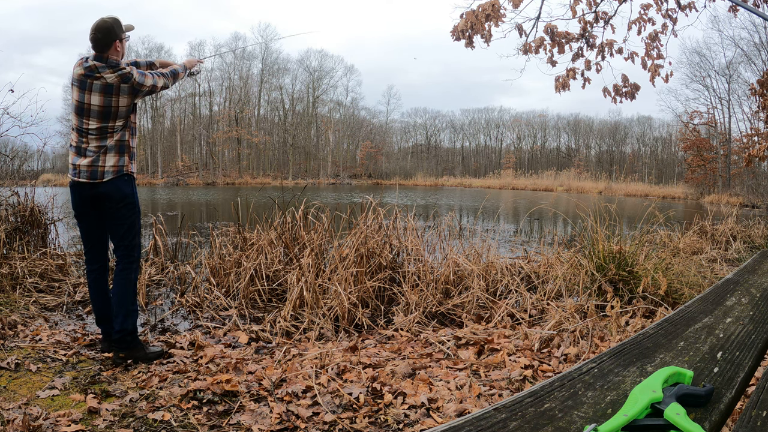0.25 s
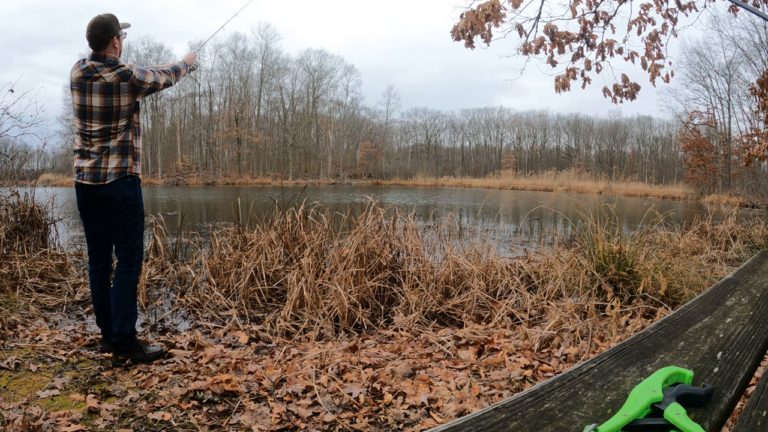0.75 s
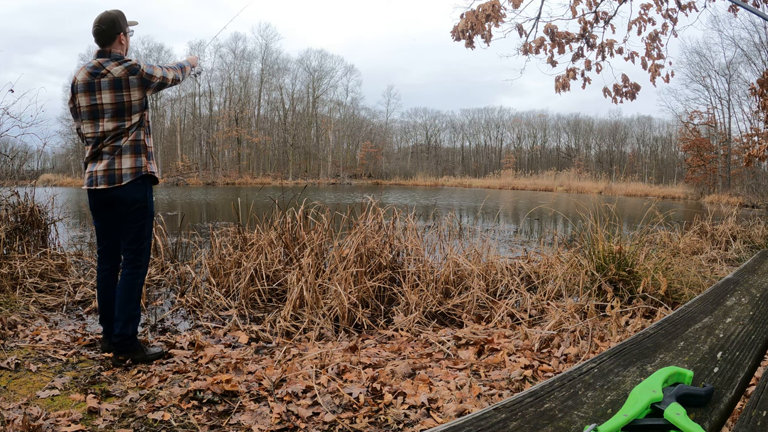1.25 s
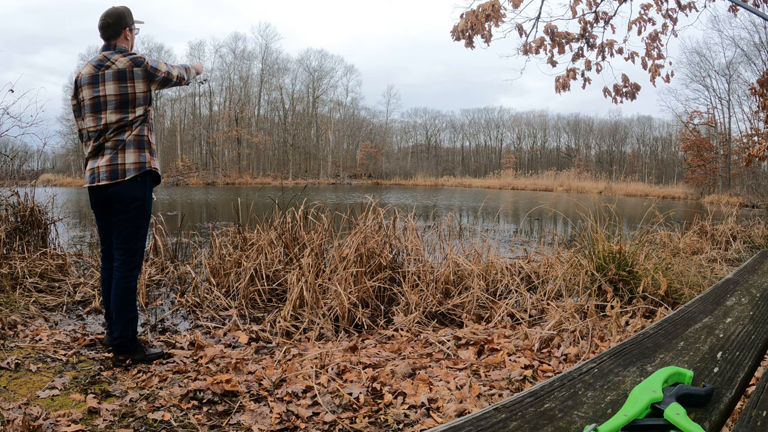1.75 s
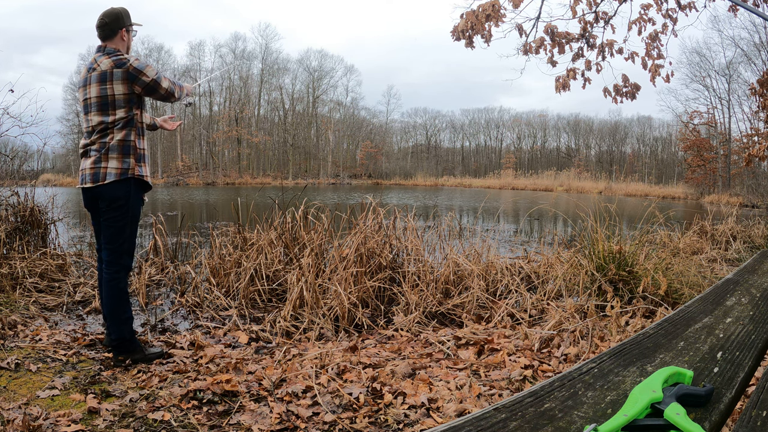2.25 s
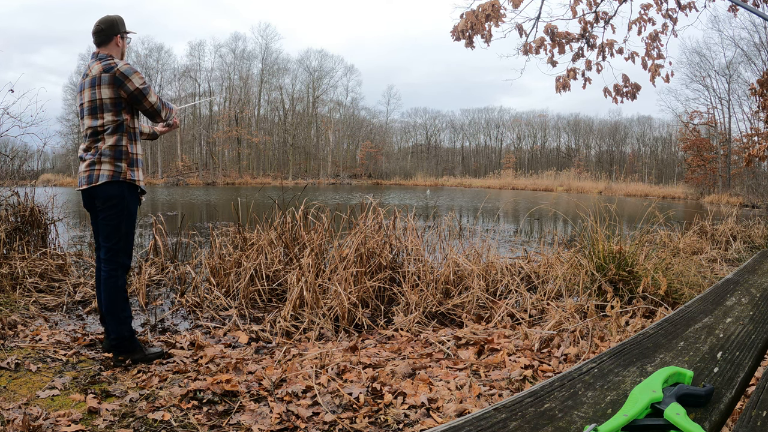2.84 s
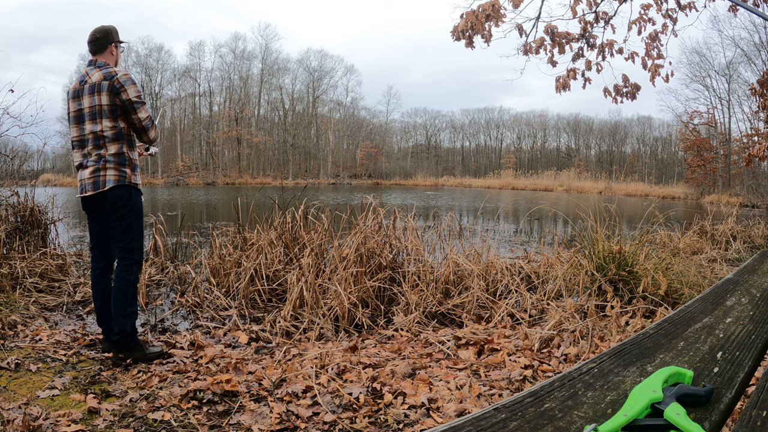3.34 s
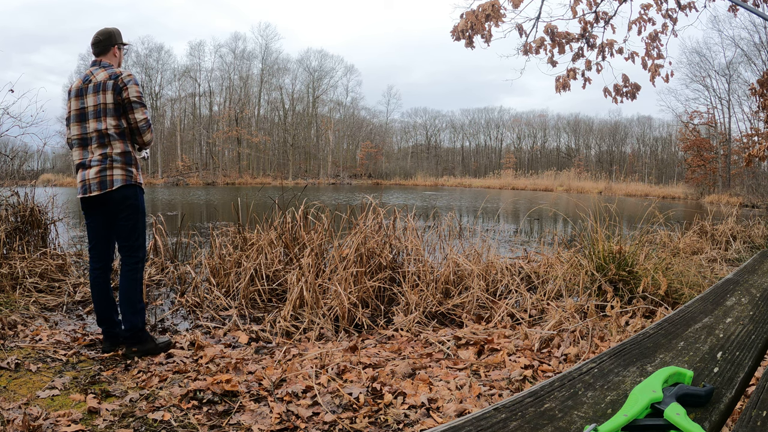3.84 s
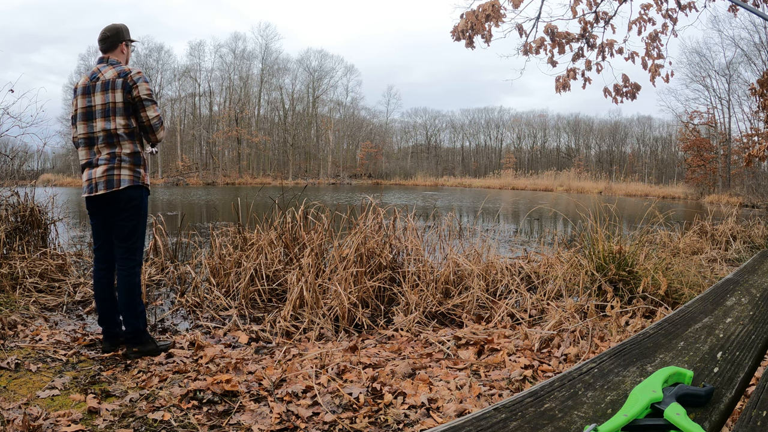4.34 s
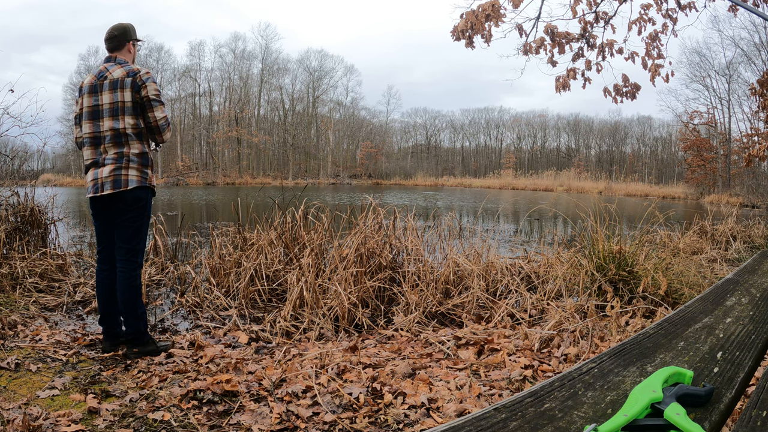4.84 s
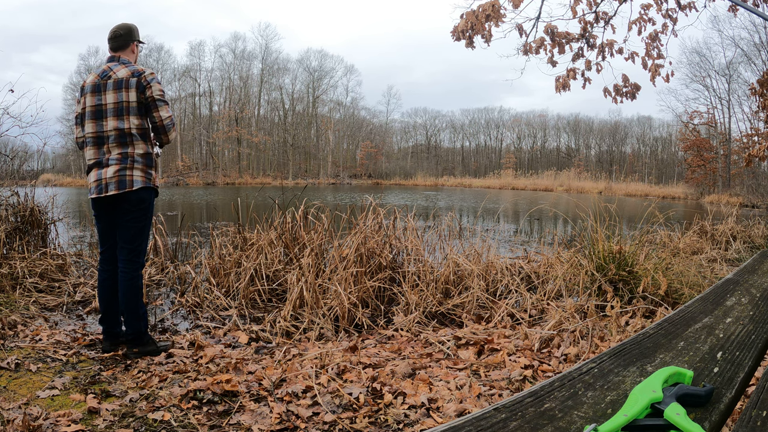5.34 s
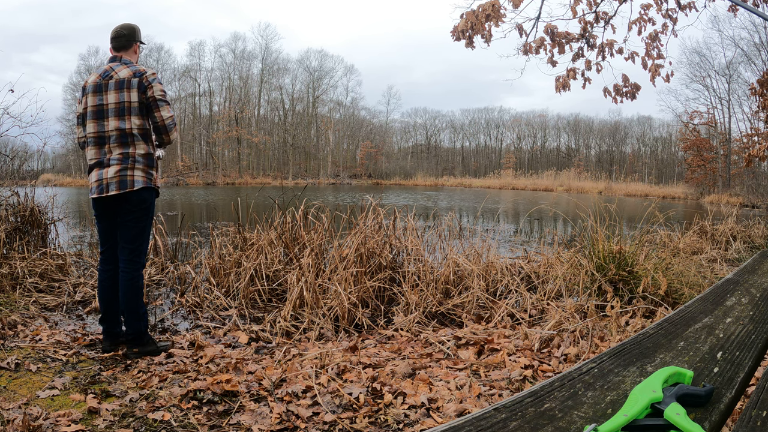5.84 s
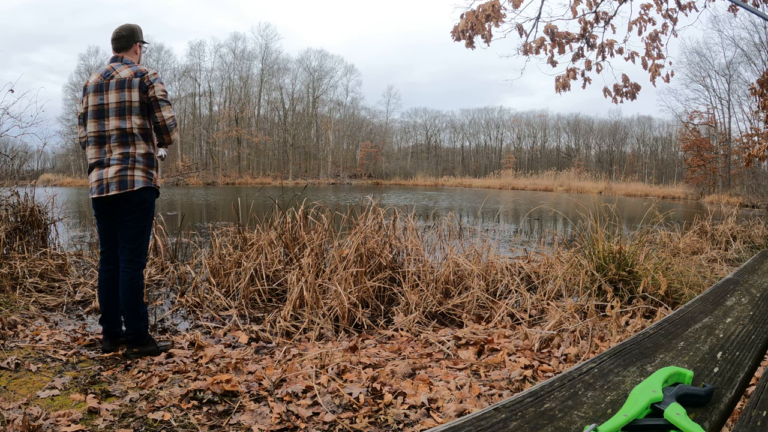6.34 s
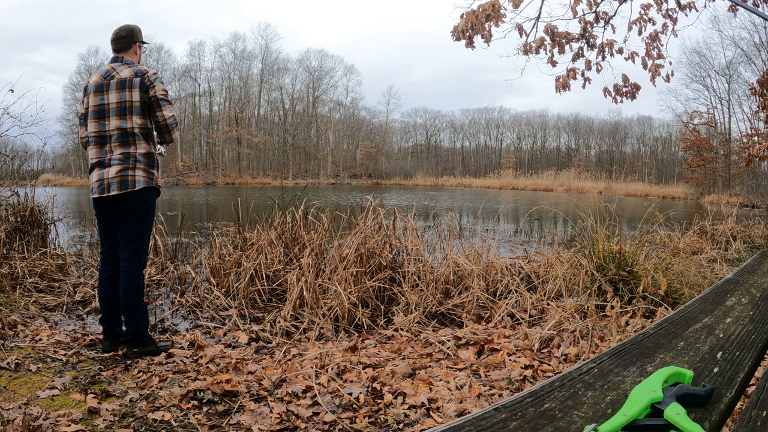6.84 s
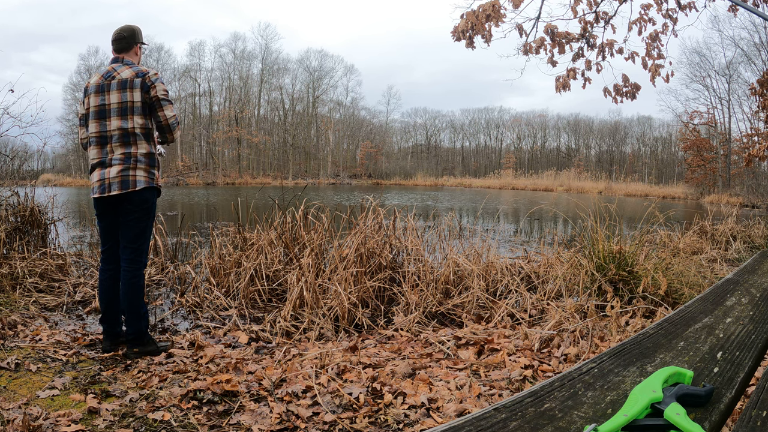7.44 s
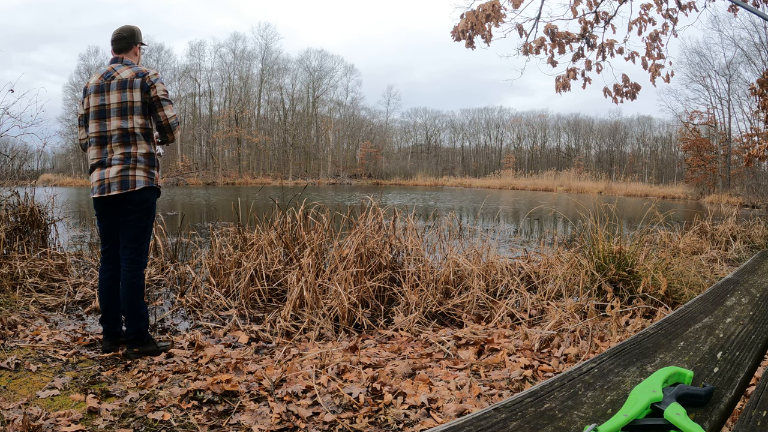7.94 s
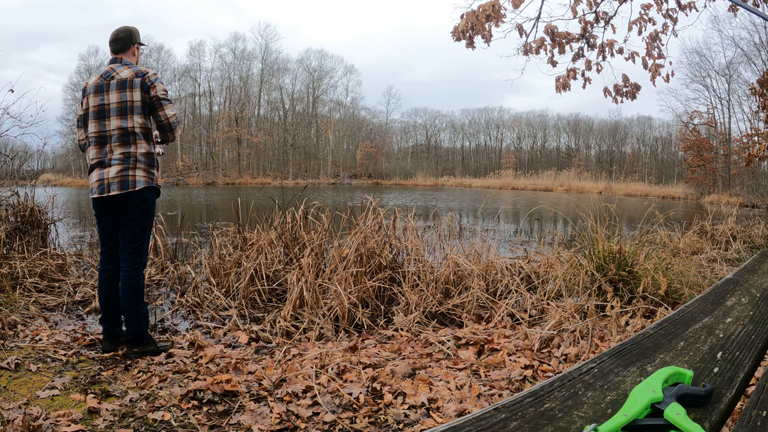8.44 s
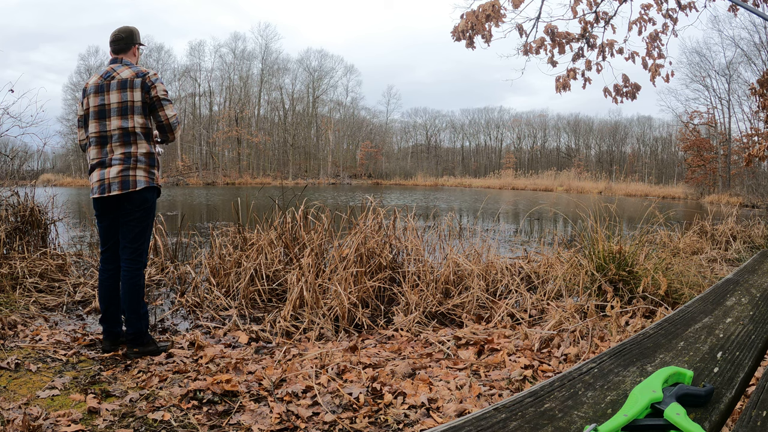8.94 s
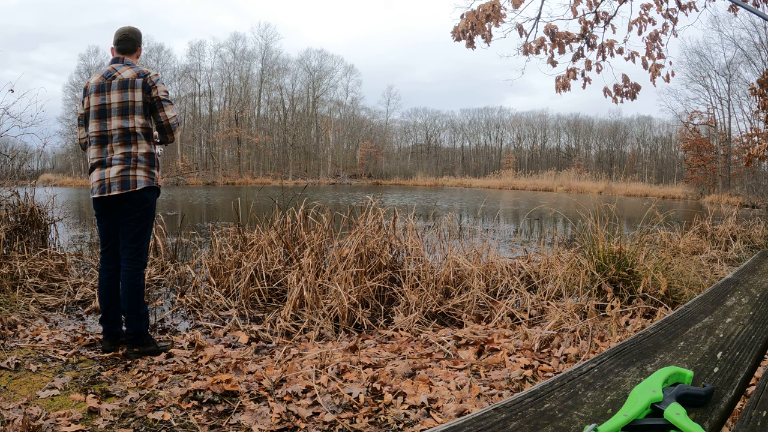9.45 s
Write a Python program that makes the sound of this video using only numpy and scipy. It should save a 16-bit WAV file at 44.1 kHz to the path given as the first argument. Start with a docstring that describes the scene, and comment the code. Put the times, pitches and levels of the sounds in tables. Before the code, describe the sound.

A fishing rod swishes into a sharp snapping crack, echoing through bare woods, then line hisses off the reel over a low distant road rumble.

```python
"""A fishing cast beside a pond

A rod is cast in bare woods: a short swell of noise leads into a snap (pressure pulses, a short modal ring);
evenly spaced planks return it as a sinking, noisy chirp, reeds and trees as lumpy, decaying noise.
Line hisses off the spool, its spectral peak sinking as the lure slows; later the reel ticks (resonant
clicks) and slack line rubs and squeaks. A distant road lies under it all: low rumble, passing heavy
vehicles, tyre roar and narrow-band tyre tones."""
import sys
import numpy as np
from scipy import signal
from scipy.fft import rfft, irfft, next_fast_len
from scipy.io import wavfile
from scipy.ndimage import uniform_filter1d, map_coordinates

SR = 44100
rng = np.random.default_rng(int(sys.argv[2]) if len(sys.argv) > 2 else 0)


def wrap_up_sound(samples):
    """Save the sound to the file named by the first command line argument, as 16-bit audio."""
    columns = np.atleast_2d(samples).T
    # keep every value between -1 and 1, then stretch to whole-number steps
    tamed = np.clip(columns, -1, 1)
    steps = np.round(tamed * 32767).astype(np.int16)
    wavfile.write(sys.argv[1], SR, steps)


N = 427329

# left-right correlation of the near sounds: [f/Hz, correlation]
NEAR_LIKENESS = [(600, .8), (3000, 0.9), (7000, .87), (12000, 0.6)]
# relative spectrum of line rubbing on a solid: [f/Hz, level/dB]
RUB_SPECTRUM = [(1500, -28.5), (3000, -4.5), (4200, 2), (6300, 1), (7700, 4), (9000, -8.5), (10700, -14.5),
                (12200, -7.5), (13500, -20.5), (15500, -34)]
SNAP_S = .2011  # moment of the snap, s


def amp(db):
    """Level definition: decibels to amplitude gain."""
    return 10 ** (np.asarray(db) / 20)


def unit(x):
    """Power normalisation: scale to rms 1."""
    return x / np.sqrt(np.mean(x ** 2) + 1e-20)


def along(points, hz):
    """Log-frequency interpolation of (f/Hz, value) points."""
    f, v = np.transpose(points)
    return np.interp(np.log(hz + 1), np.log(f + 1), v)


def curves(rows):
    """Linear interpolation in time: one value per sample for each column after t/s."""
    s, *cols = np.transpose(rows)
    return [np.interp(np.arange(N) / SR, s, c) for c in cols]


def wobble(rate):
    """Low-frequency random modulation: a smooth curve through `rate` random knots a second."""
    knots = rng.standard_normal(int(N * rate / SR) + 4)
    return map_coordinates(knots, [np.arange(N) * rate / SR])


def filtered(x, response):
    """Linear filtering: the spectrum of x times a response of frequency."""
    n = x.shape[-1]
    m = next_fast_len(n + 8192)  # padded against wrap-around
    return irfft(rfft(x, m) * response(np.fft.rfftfreq(m, 1 / SR)), m)[..., :n]


def bump(hz, centre, width):
    """Resonance curve: gain 1 at the centre, half power at the edges of the width."""
    return 1 / np.sqrt(1 + (2 * (hz - centre) / width) ** 2)


def colour(points):
    """Spectral shaping: gain as a function of frequency, from (f/Hz, level/dB) points."""
    return lambda hz: amp(along(points, hz))


def noise(gain, alike, size=N):
    """Partly coherent stereo noise of rms 1: mid and side powers set the left-right correlation."""
    def mid_side(hz):
        turn = np.arccos(np.clip(along(alike, hz), -1, 1)) / 2
        return gain(hz) * np.array([np.cos(turn), np.sin(turn)])

    mid, side = filtered(rng.standard_normal((2, size)), mid_side)
    return unit(np.array([mid + side, mid - side]))


def patches(shape, depth_db, size):
    """Random spectral fluctuation: a gain field over frequency and time, smoothed over size cells."""
    field = uniform_filter1d(rng.standard_normal(shape), size[0], 0)
    field = uniform_filter1d(field, size[1], 1)
    return unit(amp(depth_db * unit(field)))


def placed(x, s):
    """Time shift: a short stereo sound set into the scene at time s."""
    return np.pad(x, ((0, 0), (round(s * SR), N)))[:, :N]


def leftward(x, lean_db):
    """Level difference between the ears: the left is louder than the right by lean_db."""
    return x * amp(np.array([[lean_db], [-lean_db]]) / 2)


def snap(push_db, push_hz, push_s, thump_db, thump_hz, thump_lag, thump_s, crack_db, crack_lag,
         lead_in_db, lead_in_t60, scatter_db, scatter_t60, ring_attack):
    """Impulsive radiation: noise swells into a push of air with a steep crack, a thump, ring and scatter."""
    # relative spectrum of the crack and the noise around it: [f/Hz, level/dB]
    crack_spectrum = [(500, -8.5), (1200, -3), (2000, -1.5), (3100, 3), (4200, -1), (5200, 0.5),
                      (6200, -2.5), (7200, -5.5), (8300, -1), (9700, -12), (10700, -6.5), (12000, -20),
                      (15500, -28)]
    # modes of the rod: [f/Hz, level/dB, t60/s]
    rod_modes = [(660, -25, .016), (2980, -41, .025), (3245, -35, .025), (4812, -40, .03)]
    # reflections off the ground and the bench: [delay/s, level/dB]
    glance_paths = [(.0021, -14), (.0043, -11), (.0095, -15)]
    t = np.arange(SR) / SR - SNAP_S  # zero at the snap

    push = amp(push_db) * np.cos(2 * np.pi * push_hz * t) * np.exp(-(t / push_s) ** 2)
    late = t - thump_lag
    thump = amp(thump_db) * np.cos(2 * np.pi * thump_hz * late) * np.exp(-(late / thump_s) ** 2)

    front = signal.unit_impulse(SR, round((SNAP_S + crack_lag) * SR))
    crack = filtered(front, lambda hz: 1j * colour(crack_spectrum)(hz))  # quarter turn: a steep pressure front
    crack = crack / np.abs(crack).max()

    def glancing(hz):
        return 1 + sum(amp(db) * np.exp(-2j * np.pi * hz * delay) for delay, db in glance_paths)

    blow = filtered(push + amp(crack_db) * crack, glancing)

    age = np.maximum(t, 0)
    modes = sum(amp(db - 60 * age / t60) * np.cos(2 * np.pi * hz * age) for hz, db, t60 in rod_modes)
    ring = (1 - np.exp(-age / ring_attack)) * modes

    around_db = np.where(t < 0, lead_in_db + 60 * t / lead_in_t60, scatter_db - 60 * t / scatter_t60)
    around = amp(around_db) * noise(colour(crack_spectrum), [(1000, 0.77)], size=SR)
    return placed(blow + thump + ring + around, 0)


def picket_fence_echo(width_hz):
    """Picket-fence echo: the snap returns from evenly spaced planks as a noisy chirp that sinks in pitch."""
    start_hz, end_hz, sinking_s = 4430, 3060, 0.066
    level_db, attack_s, t60 = -55, .012, 1.4
    t = np.arange(SR) / SR
    pitch = end_hz + (start_hz - end_hz) * np.exp(-t / sinking_s)
    level = amp(level_db - 60 * t / t60) * (1 - np.exp(-t / attack_s))
    fuzz = noise(lambda hz: bump(hz, 0, width_hz) ** 2, [(500, 0.66)], size=SR)
    carrier = np.sqrt(2) * np.cos(2 * np.pi * np.cumsum(pitch) / SR)
    return placed(level * fuzz * carrier, SNAP_S)


def line_pitch(t):
    """Pitch proportional to speed: the swing drives it up, it holds, then air drag slows the lure."""
    swing_s, swing_length_s = 0.1, 0.161
    slow_hz, fast_hz = 4870, 14300  # before the swing and in full flight
    coast_s, half_speed_s = 0.74, 0.56  # drag takes over, and halves the speed in this time
    swing = np.clip((t - swing_s) / swing_length_s, 0, 1)
    drag = 1 + np.maximum(t - coast_s, 0) / half_speed_s
    return slow_hz * (fast_hz / slow_hz) ** swing / drag


def line(sing_db, spread, overtone_db, edge, flutter_db, slap_db, wander, patchy_db):
    """Speed-scaled friction noise: line whips off the spool, its peak and upper edge following its speed."""
    # level of the running line before flutter and panning: [t/s, level/dB]
    running_level = [(0, -64.5), (.11, -65), (.16, -55.5), (.4, -58.5), (.6, -61), (.8, -64.5),
                     (1.12, -62.5), (1.42, -66), (1.8, -76.5), (2.7, -96)]
    # relative spectrum of the hiss before the moving peak: [f/Hz, level/dB]
    hiss_spectrum = [(1200, -37), (3000, -4.5), (4700, -.5), (6500, 2), (8200, 2.5), (9300, -6),
                     (10600, -9.5), (12000, -5), (13200, -16.5), (15500, -29.5)]
    hz, t, z = signal.stft(noise(colour(hiss_spectrum), NEAR_LIKENESS), SR, nperseg=256)
    uneven = np.exp(wander * np.interp(t * SR, np.arange(N), wobble(22)))  # coils leave the spool unevenly
    ratio = hz[:, None] / (line_pitch(t) * uneven)

    peak = amp(sing_db) * bump(ratio, 0.96, spread) ** 2
    overtone = amp(overtone_db) * bump(ratio, 2.3, spread) ** 2
    gain = (1 + peak + overtone) / np.sqrt(1 + (ratio / edge) ** 6)  # slow line makes little high treble
    power = colour(hiss_spectrum)(hz)[:, None] ** 2
    gain = gain / np.sqrt((gain ** 2 * power).sum(0) / power.sum())  # the peak moves colour, not loudness

    shaped = z * gain * patches(z.shape, patchy_db, size=(4, 5))
    hiss = signal.istft(shaped, SR, nperseg=256)[1][:, :N]
    coils = flutter_db * wobble(300) + slap_db * wobble(35)  # loose coils brush the lip and slap the guides
    return hiss * amp(curves(running_level)[0] + coils)


def slack(grain_db, jerk_db):
    """Stick-slip friction: slack line rubs through the guides; each pull rises, holds and lets go."""
    # pulls, levels before panning: [t/s, length/s, level/dB, time to rise or fall by 60 dB/s]
    pull_events = [(2.75, 1.75, -79.5, 3), (3.48, .58, -76, .4), (3.62, .035, -61.5, 0.25),
                   (3.7, 0.18, -62, 0.24), (3.76, .026, -56, .25), (3.82, 0.019, -56.5, .26),
                   (3.945, 0.019, -72, .2), (9.258, .012, -77, .08), (9.31, .02, -77, .14),
                   (9.425, .016, -77, 0.2)]
    t = np.arange(N) / SR
    power = 0
    for s, length, db, edge_s in pull_events:
        away = (np.maximum(s - t, 0) + np.maximum(t - s - length, 0)) / edge_s
        power = power + amp(db - 60 * away) ** 2
    slips = unit(amp(grain_db * wobble(820) + jerk_db * wobble(45)))
    return np.sqrt(power) * slips * noise(colour(RUB_SPECTRUM), NEAR_LIKENESS)


def ticks(click_db, ping_db, t60, tail_db, tail_t60, ping_t60):
    """Impact excitation: contacts click or scrape through the reel's resonances, the struck part pings."""
    # contacts of reel and line, levels relative to click_db and ping_db (long rise: a scrape):
    # [t/s, click level/dB, brightness/(dB per octave), ping f/Hz, ping level/dB, rise/s]
    contacts = [(.671, -57, 8, 12000, -52, .0004), (.978, -54, 1.5, 8000, -46, .0004),
                (1.342, -58, 0, 7200, -52, .0004), (1.48, -60, 3, 7500, -55, .0004),
                (1.567, -63, 2, 7800, -56, .0004), (1.7813, -62, 0, 8200, -54, .0004),
                (2.4191, -69, 2, 8700, -60, .0004), (2.758, -60, 2, 2900, -42, .0008),
                (2.764, -57, -5, 5900, -56, .002), (2.773, -56, -7, 3300, -52, .003),
                (2.829, -50.5, -13, 3300, -45, .003), (3.008, -51.5, -9, 4510, -44.5, .0015),
                (3.042, -60, -10, 2900, -42, .001), (3.2615, -59, -8, 6400, -56, .003),
                (3.329, -52, -11, 3200, -44, .002), (3.381, -62, -7, 5000, -59, .002),
                (3.4702, -59, -4, 5500, -54, .0006), (3.5301, -61, -1, 7500, -56, .002),
                (3.5925, -61, 0, 7200, -43, .001), (3.6463, -56, 0, 7500, -47, .0004),
                (3.6666, -46.5, -3, 7700, -37, .0004), (4.0509, -55, -1.5, 4000, -47, .0008),
                (4.372, -60.5, 3, 8000, -55, .003), (4.38, -61, 3, 12700, -60, .001),
                (4.6685, -60, -2, 9100, -54, .0004), (4.674, -60, -2, 9000, -56, .0006),
                (4.7179, -59, -1, 5800, -52, .0004), (7.1057, -66, -2, 7700, -58, .001),
                (7.121, -67, -1, 7400, -60, .001), (7.2015, -60, -2.5, 5000, -51, .0006),
                (7.9025, -72, 3, 12000, -60, .0004), (8.8555, -68, -10, 5000, -53, .0006),
                (9.3708, -68, 0, 6300, -58, .002)]
    # resonances of reel and rod: [f/Hz, width/Hz, level/dB]
    reel_modes = [(3050, 550, 5.5), (4800, 2200, 3), (7650, 1600, 0.5), (9600, 1100, -13),
                  (12000, 1100, -17)]
    lowest_hz, tilt_top_hz = reel_modes[0][0], 7800  # brightness tilts the spectrum between these
    out, t = np.zeros((2, N + SR)), np.arange(SR // 10) / SR
    for s, db, brightness, pitch_hz, part_db, rise_s in contacts:
        def struck_body(hz):
            body = sum(amp(mode_db) * bump(hz, centre, width) ** 2 for centre, width, mode_db in reel_modes)
            octaves = np.log2(np.clip(hz, lowest_hz, tilt_top_hz) / lowest_hz)
            return body * amp(brightness * octaves)

        swell, age = np.minimum(t / rise_s, 1), np.maximum(t - rise_s, 0)
        decay = amp(-60 * age / t60) + amp(tail_db - 60 * age / tail_t60)
        click = decay * noise(struck_body, NEAR_LIKENESS, size=len(t))
        ping = amp(-60 * age / ping_t60) * np.sin(2 * np.pi * pitch_hz * t)
        contact = swell * (amp(click_db + db) * click + amp(ping_db + part_db) * ping)
        out[:, round(s * SR):][:, :len(t)] += contact
    return out[:, :N]


def squeak(start_s, start_hz, sag_hz_per_s, level_db, t60):
    """Frictional oscillation: line squeaks once as it is taken up, a thin tone that sags and fades."""
    t = np.arange(SR // 5) / SR
    phase = 2 * np.pi * np.cumsum(start_hz - sag_hz_per_s * t) / SR
    tone = np.sin(phase) * amp(level_db - 60 * t / t60)
    return placed(np.array([tone, tone]), start_s)


def fidget(level_db, scatter_db, t60, count=70):
    """Random impulse train: fingers, reel and line tick faintly, a few ticks stronger than the rest."""
    when, size = rng.random((count, 2)).T
    blows = np.bincount((when * N).astype(int), amp(level_db + scatter_db * size ** 3), N)
    fade = signal.lfilter([1], [1, -amp(-60 / (t60 * SR))], blows)  # exponential decay
    return fade * noise(colour(RUB_SPECTRUM), NEAR_LIKENESS)


def woods(far_db, clump_db, patchy_db):
    """Reflection and reverberation: reeds and near trunks answer first, far trees with a lumpy tail."""
    # relative spectrum of the echo: [f/Hz, level/dB]
    echo_spectrum = [(300, -8), (700, 1), (1300, 4), (2200, -2), (3100, 1.5), (4000, -1.5), (5000, -6),
                     (7500, -8), (10000, -30), (15000, -36)]
    # decay time of the tail: [f/Hz, t60/s]
    decay_times = [(500, 0.67), (3000, 0.99), (8000, 0.74), (14000, .4)]
    # returns from reeds and near trunks, before decay and lumps: [delay/s, spread/s, level/dB]
    near_returns = [(.031, .014, -44.5), (.059, .01, -48)]
    source = noise(colour(echo_spectrum), [(500, .7), (3000, 0.49)], size=2 * SR)
    hz, age, z = signal.stft(source, SR, nperseg=256)
    near = sum(amp(db) * np.exp(-((age - delay) / spread) ** 2) for delay, spread, db in near_returns)
    returns = (amp(far_db) + near) * patches(z.shape, patchy_db, size=(4, 4))  # each trunk has its own colour
    decay = amp(-60 * age / along(decay_times, hz)[:, None])
    tail = signal.istft(z * returns * decay, SR, nperseg=256)[1]
    return placed(tail, SNAP_S) * amp(clump_db * wobble(71))


def road():
    """Superposed distant sources: near-mono lumpy rumble, heavy vehicles, wide tyre roar and tyre tones."""
    # relative spectra of rumble, vehicle drone and tyre roar: [f/Hz, level/dB]
    rumble_spectrum = [(15, -11), (30, -6), (42, -0.5), (68, 2), (95, 0), (125, -4.5), (150, -12),
                       (200, -13.5), (300, -26.5), (600, -54.5), (1500, -100)]
    drone_spectrum = [(60, -26), (85, -8.5), (120, 3), (160, -3), (205, -10.5), (260, -20), (400, -44.5),
                      (800, -100)]
    roar_spectrum = [(100, -11.5), (280, 1), (410, -1.5), (600, 0), (820, 3), (1100, 1.5), (1300, -2.5),
                     (1650, -2.5), (2400, -13.5), (3000, -18), (4000, -28), (6000, -37.5), (7800, -42.5),
                     (9500, -60.5)]
    # tyre tones, levels against the roar, drifting: [f/Hz, width/Hz, start level/dB, end level/dB]
    tyre_tones = [(346.2, 24, -8, -13), (477.3, 22, -14, -11.5), (499.7, 40, -13, -12),
                  (777, 45, -19.5, -19), (956, 80, -8.5, -6.5)]
    # left-right correlation of the road: [f/Hz, correlation]
    road_likeness = [(140, 1), (200, .999), (350, .985), (480, .93), (750, .72), (1400, .61), (2800, .52),
                     (7000, .55)]
    # rumble level before its lumps: [t/s, level/dB]
    rumble_level = [(0, -33.5), (1.3, -33), (2.1, -33), (2.8, -34), (3.8, -34.5), (5.3, -34.3),
                    (6.5, -32.5), (7.8, -35.5), (8.6, -33.5), (9.69, -34.5)]
    # heavy vehicles passing: [t nearest/s, time to fall to half power/s, level/dB]
    passages = [(4.3, .55, -44.5), (6.1, .4, -42.5), (7.55, .2, -44)]
    roar_db, recede_db_per_s = -43.5, 0.2442  # roar level at the start; the traffic slowly thins out
    t = np.arange(N) / SR

    lumps = amp(curves(rumble_level)[0] + 0.65 * wobble(7))
    rumble = lumps * noise(colour(rumble_spectrum), road_likeness)
    passing = np.sqrt(sum(amp(db) ** 2 / (1 + ((t - s) / fall_s) ** 2) for s, fall_s, db in passages))
    trucks = passing * noise(colour(drone_spectrum), road_likeness)

    roar = amp(0.19 * wobble(3.9)) * noise(colour(roar_spectrum), road_likeness)
    for centre, width, start_db, end_db in tyre_tones:
        tone = noise(lambda hz: bump(hz, centre, width) ** 2, road_likeness)
        roar = roar + amp(np.linspace(start_db, end_db, N) + 0.8 * wobble(2.2)) * tone
    return rumble + trucks + amp(roar_db - recede_db_per_s * t) * roar


def scene():
    """Superposition: the tackle lies to the left; road and woods lie all around."""
    tackle = line(sing_db=3.5, spread=.27, overtone_db=-4, edge=1.38, flutter_db=1.2, slap_db=0.5,
                  wander=.02, patchy_db=2.0)
    tackle = tackle + slack(grain_db=2.0, jerk_db=1.5)
    tackle = tackle + ticks(click_db=-2.5, ping_db=-7.5, t60=0.016, tail_db=-12.5, tail_t60=0.14, ping_t60=.009)
    tackle = tackle + squeak(start_s=2.833, start_hz=3380, sag_hz_per_s=5000, level_db=-59.5, t60=.2)
    tackle = tackle + fidget(level_db=-77.5, scatter_db=6, t60=.03)
    planks = picket_fence_echo(width_hz=1050)
    crack = snap(push_db=-15, push_hz=770, push_s=0.00071,
                 thump_db=-30.5, thump_hz=228, thump_lag=.003, thump_s=.004,
                 crack_db=-15.8, crack_lag=.0003, lead_in_db=-37.5, lead_in_t60=0.03,
                 scatter_db=-30.5, scatter_t60=0.04, ring_attack=.0007)
    echo = woods(far_db=-44.0, clump_db=2.5, patchy_db=2.0)
    return leftward(tackle, lean_db=4.0) + planks + crack + echo + road()


def record(dry):
    """Band limitation: an ideal low-pass removes everything from the top frequency up."""
    top_hz = 15600
    return filtered(dry, lambda hz: hz < top_hz)


dry = scene()
out = record(dry)
wrap_up_sound(out)
```